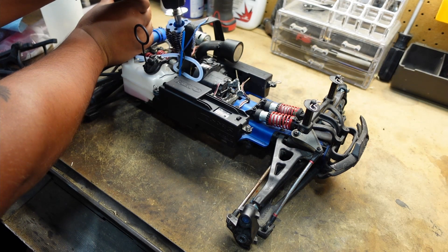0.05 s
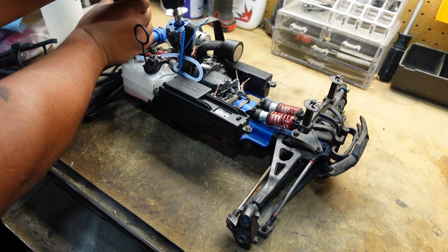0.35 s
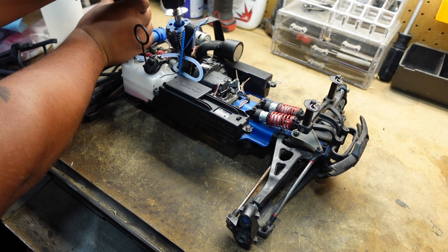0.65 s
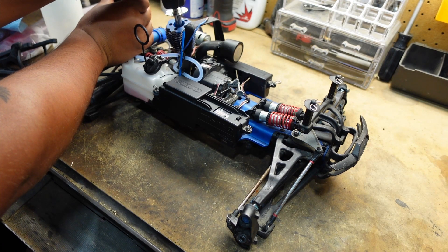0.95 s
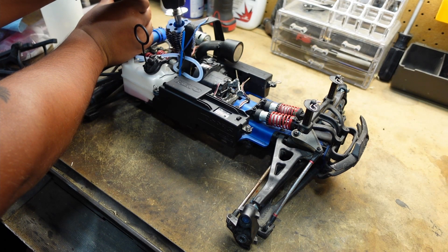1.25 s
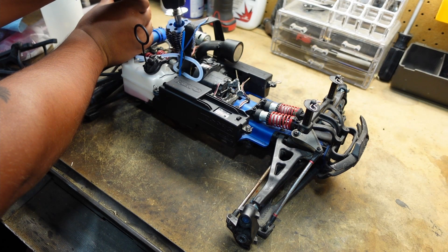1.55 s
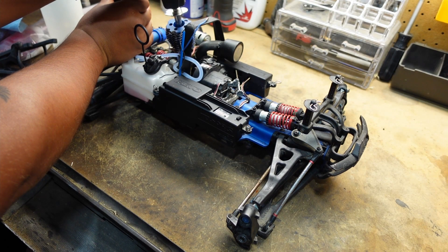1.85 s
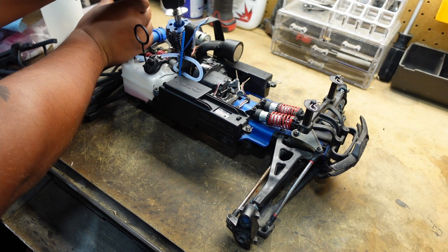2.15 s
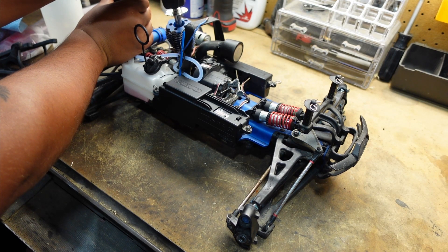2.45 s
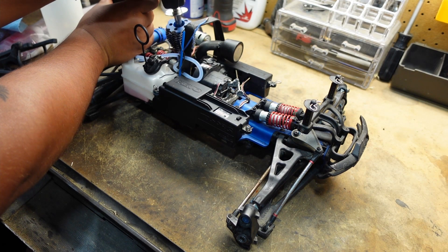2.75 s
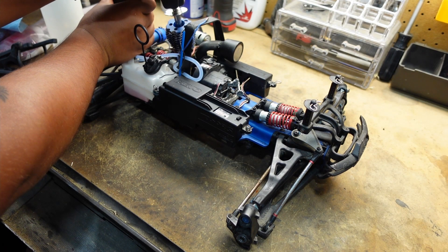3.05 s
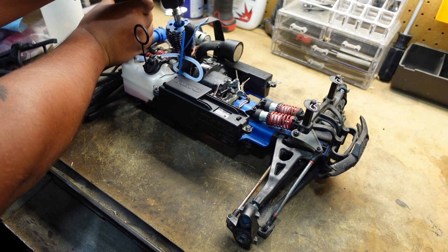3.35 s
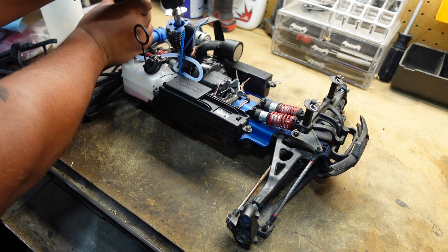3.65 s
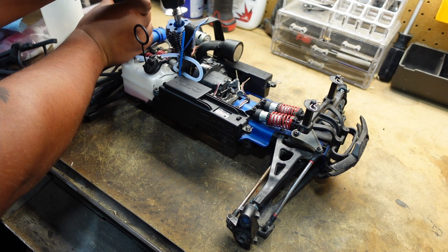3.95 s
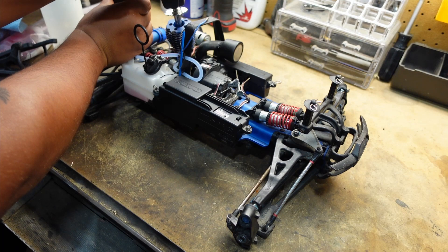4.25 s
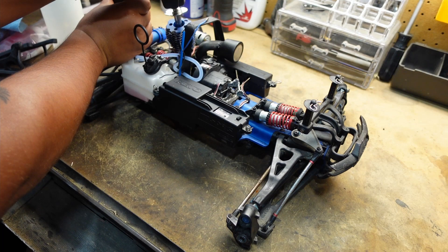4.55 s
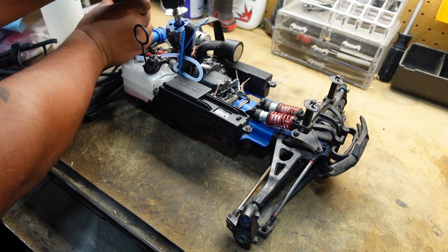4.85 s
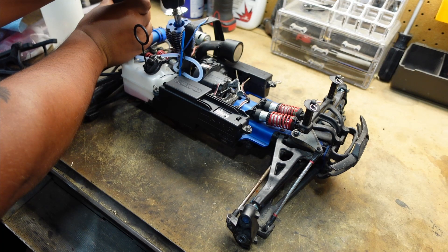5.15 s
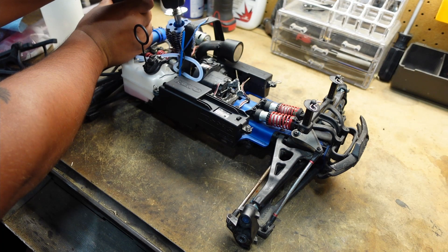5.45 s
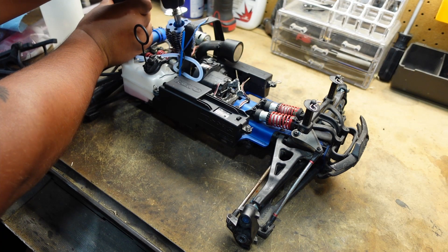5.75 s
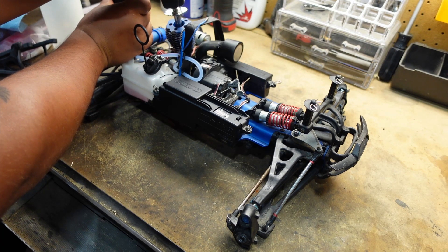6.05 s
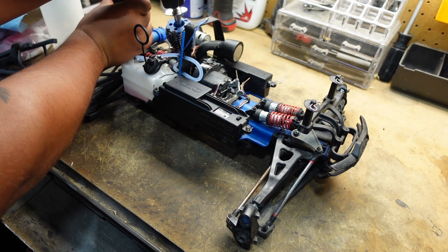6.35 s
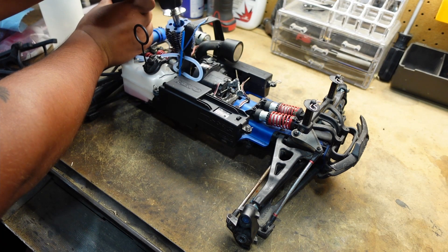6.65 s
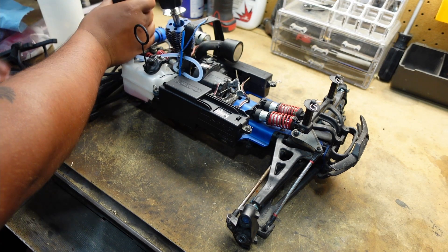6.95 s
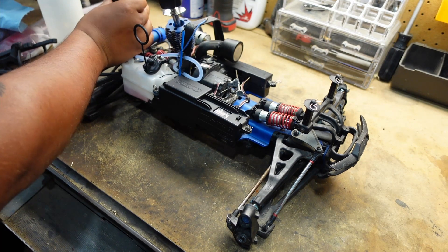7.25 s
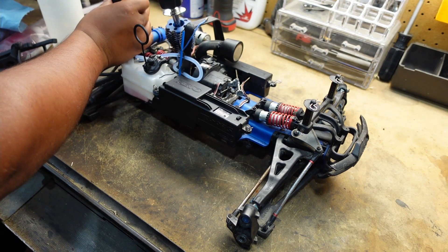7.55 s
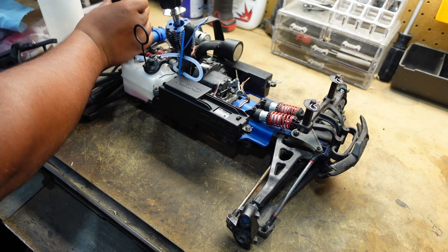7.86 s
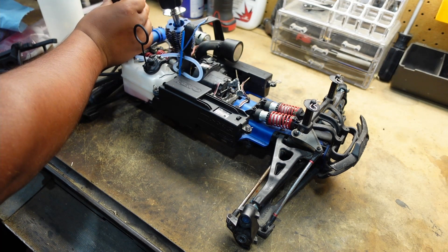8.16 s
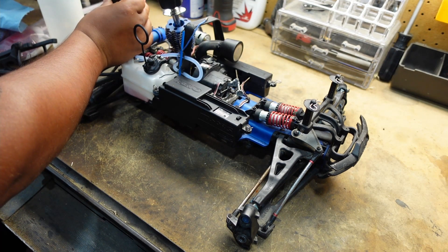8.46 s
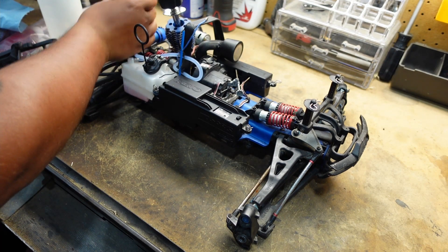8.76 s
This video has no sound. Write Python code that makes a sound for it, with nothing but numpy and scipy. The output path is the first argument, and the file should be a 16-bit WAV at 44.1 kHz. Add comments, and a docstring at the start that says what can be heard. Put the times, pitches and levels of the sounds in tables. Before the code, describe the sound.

An electric starter is already cranking a model truck's small nitro engine, close to the microphone on a garage bench. Sharp, hollow exhaust pops repeat about twenty-four times a second over grinding, whining, clacking gears, with scattered hard metallic snaps. This first burst stops at about 2.6 seconds, followed by small clicks. A second runs from 3.4 to 5.5 seconds, sagging towards its end. Shorter, slower bursts follow at 5.8 to 6.6 and 7.2 to 7.5 seconds, and the most laboured from 7.9 to 8.7. Each restart opens with a quick whirr and a rattling knock, and the motor briefly coasts down after every burst. The engine never fires. Light clicks and faint rubbing fall in the pauses. Near 9 seconds the truck slides and bumps softly on the bench. Short reverberation and a low room hush lie behind everything.

```python
"""A garage bench, one microphone close to a model truck. An electric starter spins its small nitro
engine in five bursts; it never fires. Every turn the gears take up their slack, grind and whine
against the compression, then the port pops into the muffler. The cranking grows slower and more
laboured, and the starter motor coasts down after each burst. Bench and back board give close echoes;
behind them are the walls' short reverberation and a low room tone."""
import sys
import numpy as np
from scipy import signal
from scipy.fft import rfft, irfft, next_fast_len
from scipy.io import wavfile

SR = 44100
rng = np.random.default_rng(int(sys.argv[2]) if len(sys.argv) > 2 else 0)


def transcribe(signal):
    """Save signal, clipped to [-1, 1], as a 16-bit WAV file at the path in sys.argv[1]."""
    frames = np.atleast_2d(signal).T
    limited = np.clip(frames, -1, 1)
    pcm = np.round(limited * 32767).astype(np.int16)
    wavfile.write(sys.argv[1], SR, pcm)


N = 397774

# Pulls of the trigger: (first pop [s], turns [count], first rate [turns/s], last rate [turns/s],
# bend [above 0 the rate sags late, below 0 early])
BURSTS = [ (-.0112, 63, 24.19, 23.46, 6.3), (3.4768, 46, 24.154, 20.78, 2.67),
          (5.8598, 15, 21.27, 16.21, 2.7), (7.252, 5, 21.27, 17.83, 7.7), (8.0633, 10, 16.93, 14.54, -9.4),
          ]
# How hard the gears are pressed together, one entry a burst: (level [dB])
PUSH_DB = [-0.41, -0.019, .2, 1.3, 0.057]
def crank(full_turns_per_s=24, let_go_turns=0.93, slowest=0.64):
    """The starter turns the crank: angle [turns], share of full speed and drive strength, per sample."""
    t, angle, speed, drive = clock(), np.zeros(N), np.ones(N), np.zeros(N)
    for burst, push_db in zip(BURSTS, PUSH_DB):
        turns = turn_times(*burst)
        run_up = 2 * (turns[1] - turns[0])  # from rest it gathers speed evenly over one turn
        now = (t >= turns[0] - run_up) & (t < turns[-1])
        first_turn = np.minimum(1 + (t[now] - turns[0]) / run_up, 1) ** 2
        angle[now] = np.interp(t[now], turns, np.arange(len(turns))) + first_turn - 1
        speed[now] = np.gradient(angle[now]) * SR / full_turns_per_s
        # the trigger is let go during the last turn
        drive[now] = amp(push_db) * np.sqrt(ramp((len(turns) - 1 - angle[now]) / let_go_turns))
    return angle, np.maximum(speed, slowest), drive


def turn_times(first, count, first_rate, last_rate, bend):
    """One burst's whole turns: the starter sags as it tires, and makes a last turn without a pop."""
    tired = np.expm1(bend * np.linspace(0, 1, count)) / np.expm1(bend)
    rate = np.append(first_rate + (last_rate - first_rate) * tired, last_rate)
    return first + np.append(0, np.cumsum(1 / rate))


def crank_passes(share, jitter_s=.00022, wander_s=.0006):
    """Times at which the crank passes this share of a turn; it runs a little unevenly."""
    bursts = [turn_times(*burst) for burst in BURSTS]
    times = np.concatenate([turns[:-1] + share * np.diff(turns) for turns in bursts])
    jitter = jitter_s * rng.standard_normal(len(times))
    return times + jitter + wander_s * np.interp(times, clock(), wobble(6))


# The port from close by, at full speed and barely turning, and the muffler behind it:
# (frequency [Hz], level [dB], t60 [s])
FAST_CRACK_MODES = [(810, -33.5, 0.005), (1290, -15.5, 0.0061), (1478, -24.5, 0.022), (1611, -33.5, 0.054),
                    (1786, -16, 0.007), (2805, -17, 0.0045), (2922, -20, 0.023), (3100, -30, 0.07),
                    (3383, -17.5, 0.0133), (4010, -21.5, 0.0042), (4420, -35.5, 0.079),
                    (4870, -15.5, 0.0045), (5740, -25, 0.011), (7720, -16.5, 0.0048), (7680, -35, 0.0734),
                    (8590, -15, 0.004)]
SLOW_CRACK_MODES = [(637, -35, 0.034), (786, -26.5, 0.021), (1580, -16, 0.0054), (1804, -32, 0.097),
                    (2290, -16.5, 0.0075), (2840, -15.5, 0.0034), (3460, -22, 0.017), (3790, -14, 0.0093),
                    (4510, -26.5, 0.013), (5380, -23.5, 0.0068), (7900, -26.5, 0.012), (9700, -29, 0.0067)]
MUFFLER_MODES = [(137, -26, 0.066), (217.5, -33.5, 0.071), (273.5, -19, 0.014), (427.8, -17.5, 0.04)]
def exhaust(speed, scatter_db=.5, soft_hz=8800, muffler_hz=580, leak_hz=102):
    """The port opens once a turn: a sharp crack, then the muffler's hollow thump."""
    times = crank_passes(0)
    size = amp(scatter_db * rng.standard_normal(len(times)))
    slow = ramp((.96 - np.interp(times - .005, clock(), speed)) / 0.32)
    crack = amp(-2) * through(blows(times, size * np.sqrt(1 - slow)), ring(FAST_CRACK_MODES))
    crack += amp(-1) * through(blows(times, size * np.sqrt(slow)), ring(SLOW_CRACK_MODES))
    # a slow piston uncovers the port more gradually, so the gas leaves later and booms deeper
    later = times + 0.000076 + 0.0016 * slow
    gas = through(blows(later, amp(-.5 * slow) * np.sqrt(size)), ring(MUFFLER_MODES))
    gas += through(blows(later, amp(-27) * np.sqrt(slow)), ring([(181, 0.016, 0.056)]))
    muffled = passed(gas, muffler_hz, "low", order=4)
    return passed(crack, soft_hz, "low", order=4), passed(muffled, leak_hz, "high", order=7)


# Grinding teeth, close up: (frequency [Hz], spectral level [dB])
GRIND_SPECTRUM = [(42, -8.5), (75, -16), (180, 0.5), (300, -10), (560, -15.5), (800, -3), (1000, -6),
                  (1400, -2), (2400, 0.5), (3600, 2), (5800, -3), (9700, -5), (11000, -12), (15000, -8.5),
                  (16000, -24)]
# How strongly the gear case radiates a tone: (frequency [Hz], gain [dB])
GEAR_CASE_RESPONSE = [(1100, -7), (1500, -4), (1950, 1), (2700, -9), (3750, 2), (4400, -3), (5100, 1),
                      (6000, 0), (8000, -7)]
def gears(angle, speed, drive, teeth=83, grind_db=-26.5, slack_db=-5, whine_db=-32.7, bite_turns=0.37):
    """The gears run slack after each pop, then bite and grind up to the next compression."""
    turn = angle % 1
    since_bite = turn - bite_turns
    load = ramp(since_bite / 0.017 + .5) * amp(-4 * since_bite) * (1 - ramp((turn - .72) / 0.4))
    contact = (load + amp(slack_db)) / (1 + amp(slack_db))
    # compression brakes the crank within each turn, the more so the slower it runs
    swing = np.clip(.1 / speed ** 2.3, 0, .3) * np.sin(2 * np.pi * (turn - .5))
    mesh_phase = teeth * (2 * np.pi * angle + swing) + .22 * wobble(700)
    scrape = chassis_noise(GRIND_SPECTRUM) * unit(amp(2 * np.cos(mesh_phase)))
    grind = amp(grind_db + 16 * np.log10(speed) + 0.66 * wobble(25)) * contact * scrape
    # the meshing teeth sing a falling chirp that flares as it crosses the resonances of the case
    chirp = sum(amp(db + 2.5 * wobble(220)) * np.sin(k * mesh_phase)
                for k, db in enumerate([0, -11, 0, -11], 1))
    whine = filtered(chirp, lambda hz: amp(along(GEAR_CASE_RESPONSE, hz)))
    strain = ramp((turn - .5) / .22) * (1 - ramp((turn - .78) / .2))
    return drive * (grind + amp(whine_db) / speed ** .5 * strain * whine)


# Metal striking metal in the drive: (frequency [Hz], spectral level [dB])
CLACK_SPECTRUM = [(150, -13.5), (550, -15.5), (800, -1), (1100, -2.5), (1800, -1.5), (3200, 3.5),
                  (5000, -3), (9000, -16), (15000, -23)]
def clacks(speed, clack_db=-24, bite_turns=.425, bounces=3, spread_s=0.0049, scatter_db=1.0):
    """The drive takes up its backlash once a turn, in a few quick uneven bounces."""
    times = crank_passes(bite_turns)[:, None]
    scatter = scatter_db * rng.standard_normal((len(times), bounces))
    delays = spread_s * (np.arange(bounces) + rng.random((len(times), bounces))) / bounces
    db = clack_db + 50 * np.log10(np.interp(times, clock(), speed)) + scatter
    power = through(blows((times + delays).ravel(), amp(db).ravel() ** 2), fading(0.02) ** 2)
    return np.sqrt(np.abs(power)) * chassis_noise(CLACK_SPECTRUM)


# Hard snaps of the drive: (time [s], level [dB])
SNAPS = [(0.173, -6.5), (0.2967, -15), (0.3371, -13.5), (0.5008, -17), (0.5422, -12), (0.7927, -11),
         (1.1657, -12.5), (1.8664, -8.5), (1.9515, -6.5), (2.4957, -9), (4.5416, -11), (5.1616, -5.5),
         (7.2732, -8)]
def snaps(gain_db=-13, rebound_s=.0025, rebound_db=-2, t60_s=0.022, thin_hz=1150):
    """Now and then the drive snaps home hard and rebounds once."""
    times, db = np.transpose(SNAPS)
    hits = blows(times, amp(db) ** 2) + blows(times + rebound_s, amp(db + rebound_db) ** 2)
    envelope = np.sqrt(np.abs(through(hits, fading(t60_s) ** 2)))
    thin_metal = unit(passed(chassis_noise(CLACK_SPECTRUM), thin_hz, "high", order=4))
    return amp(gain_db) * envelope * thin_metal


def grip(loose_db=-7, skip_s=0.0047):
    """Gain of the drive: 1 while it holds, less as it misses its grip just before a snap."""
    times = np.transpose(SNAPS)[0]
    steps = np.ones(len(times))
    loose = np.cumsum(blows(times - skip_s, steps) - blows(times, steps))
    return amp(loose_db * loose)


# The drive catches the resting engine, from the second burst on:
# (time [s], whirr level before it [dB], knock level [dB], rattle t60 [s], puff delay [s])
CATCHES = [(3.392, -35.5, -7, .1, 0.0112), (5.764, -37, -7.5, 0.081, .012), (7.163, -35.5, -8, 0.095, .012),
           (7.94, -43.5, -18.5, 0.18, .024)]
TRIGGER_LEAD_S = 0.07  # the trigger clicks this long before each catch
def catches(knock_gain_db=-1, rattle_gain_db=-21):
    """The drive catches with a rattling knock and the half-filled cylinder gives a soft puff."""
    times, _, db, t60, delay = np.transpose(CATCHES)
    knock = through(blows(times, amp(db + knock_gain_db)), ring(SLOW_CRACK_MODES))
    shake = sum(through(blows(times[[k]], amp(db[[k]] / 2)), fading(t60[k])) for k in range(len(times)))
    cylinder = ring([(185, -29, .15), (125, -35, .1), (380, -36, .07)])
    puff = through(blows(times + delay, np.ones(len(times))), cylinder)
    return knock + amp(rattle_gain_db) * shake * chassis_noise(CLACK_SPECTRUM) + puff


# The starter running free, close up: (frequency [Hz], spectral level [dB])
MOTOR_SPECTRUM = [(88, -33), (150, -7.5), (254, -10), (439, -24), (601, -18), (821, -1), (1060, -1.5),
                  (4320, 0.5), (9260, -10), (16000, -21.5)]
# Its housing: (frequency [Hz], level [dB], t60 [s])
HOUSING_MODES = [(990, -10.5, 0.089), (2870, -1.5, 0.066), (3690, -1, 0.09)]
def motor(gain_db=-2.5, rise_s=.045, handover_s=.018, coast_db=-49, hold_s=0.082, fall_db_per_s=145):
    """The starter motor whirrs up, gives way to the gears, and coasts down after the release."""
    t = clock()
    rising = sum(amp(db) * ramp((t - s + TRIGGER_LEAD_S) / rise_s) * ramp(1 - (t - s) / handover_s)
                 for s, db, *_ in CATCHES)
    since_release = [t - turn_times(*burst)[-1] for burst in BURSTS]
    coasting = sum(ramp(1 + age / handover_s) * amp(coast_db - fall_db_per_s * (age - hold_s).clip(0))
                   for age in since_release)
    # the housing sings only while the motor pulls hard
    pull = amp(-1) * rising ** 2 / rising.max()
    housing = pull * unit(through(rng.standard_normal(N), ring(HOUSING_MODES)))
    flutter = amp(gain_db + wobble(40) + 1.2 * wobble(700))
    return flutter * ((rising + coasting) * chassis_noise(MOTOR_SPECTRUM) + housing)


# Resonances of chassis and gear case: (frequency [Hz], width [Hz], lift [dB])
CHASSIS_RESONANCES = [(812, 39, 5.5), (1250, 210, 2), (1820, 190, 0), (2760, 40, 0.5), (3065, 60, 0.5),
                      (3540, 150, -2), (3770, 58, 5.5), (4760, 74, 2.5), (5800, 89, 3.5), (7500, 100, 1),
                      (8600, 15, 6.5)]
def chassis_noise(spectrum):
    """Noise of rms 1 as the chassis radiates it towards the microphone."""
    def lift(hz):
        return sum(db / (1 + (2 * (hz - centre) / width) ** 2) for centre, width, db in CHASSIS_RESONANCES)
    return unit(filtered(rng.standard_normal(N), lambda hz: amp(along(spectrum, hz) + lift(hz))))


# Small clicks of the starter: (time [s], level [dB])
CLICKS = [(2.8177, -38.5), (2.8928, -47), (2.9991, -66), (5.669, -36), (6.813, -34.5), (6.885, -57),
          (7.767, -52.5), (8.9206, -37.5), (8.9725, -39)]
# Their colour: (frequency [Hz], spectral level [dB])
CLICK_SPECTRUM = [(500, -22), (3000, -15), (5000, -8), (9000, -13.5), (15000, -27.5)]
def clicks(gain_db=-9, trigger_db=-53, t60_s=0.035):
    """The starter and its trigger give short, bright clicks."""
    times, db = np.transpose(CLICKS + [(s - TRIGGER_LEAD_S, trigger_db) for s, *_ in CATCHES])
    return through(blows(times, amp(db + gain_db)), fading(t60_s)) * noise(CLICK_SPECTRUM)


# The bench top under the truck: (frequency [Hz], spectral level [dB])
BENCH_SPECTRUM = [(35, -29.5), (60, -6), (589, -3.5), (1170, -13.5), (1910, -10.5), (5400, -24),
                  (12000, -62), (15600, -93), (22000, -120)]
def bench_bump(slide_at_s=8.932, slide_db=-53, thud_at_s=8.989, thud_db=-38.5, rise_s=0.0093, t60_s=.05):
    """At the end the truck slides on the bench and bumps down."""
    slide = amp(slide_db) * ramp((clock() - slide_at_s) / rise_s)
    age = clock() - thud_at_s
    thud = ramp(age / rise_s) * amp(thud_db - 60 * np.maximum(age - rise_s, 0) / t60_s)
    return (slide + thud) * noise(BENCH_SPECTRUM)


# The starter shifts in the hand, and at the end the truck scrapes as it slides on the bench: # (time [s],
# length [s], level [dB])
RUBS = [(2.757, .05, -53), (7.588, 0.048, -48.5), (7.736, 0.16, -64.5), (8.942, .06, -55)]
def rubs(rough_db=3):
    """Faint scratchy rubbing as the starter is reseated after a burst, and a higher scrape as the truck slides
    on the bench at the end."""
    t = clock()
    level = sum(amp(db) * ramp(2 * (t - s) / length) * ramp(2 * (s + length - t) / length)
                for s, length, db in RUBS)
    return level * amp(rough_db * wobble(170)) * chassis_noise(MOTOR_SPECTRUM)


# Bench and back board, by paths about 1 and 2 m longer than the direct one: (delay [s], level [dB])
CLOSE_ECHOES = [(.0031, -5.5), (.0059, -11.5)]
def with_echoes(x):
    """The direct sound reaches the microphone first, then its echoes off the surfaces close by."""
    return x + sum(amp(db) * np.pad(x, (round(s * SR), 0))[:N] for s, db in CLOSE_ECHOES)


# The garage walls, farther off: (frequency [Hz], t60 [s])
WALL_DECAY = [(150, 0.54), (1000, 0.26), (4000, 0.18), (14000, 0.32)]
def reverberation(x, delay_s=.006):
    """The garage's diffuse answer; each frequency dies at its own speed."""
    hz, t, spectra = signal.stft(rng.standard_normal(SR // 2), SR, nperseg=256)
    tail = signal.istft(spectra * amp(-60 * t / along(WALL_DECAY, hz)[:, None]), SR, nperseg=256)[1]
    return through(x, np.pad(tail / np.linalg.norm(tail), (round(delay_s * SR), 0)))


# The quiet garage all around the microphone: (frequency [Hz], spectral level [dB])
ROOM_TONE_SPECTRUM = [(25, -6), (90, -7), (190, -6.5), (300, -12), (370, -7.5), (520, -19), (850, -19.5),
                      (1900, -28), (3000, -38), (16000, -49)]
def room_tone(level_db=-61):
    """A steady low hush behind everything."""
    return amp(level_db) * noise(ROOM_TONE_SPECTRUM)


def amp(db):
    """Decibels to gain."""
    return 10 ** (np.asarray(db) / 20)


def unit(x):
    """Scale to rms 1."""
    return x / np.sqrt(np.mean(x ** 2) + 1e-20)


def along(points, hz):
    """Interpolate (Hz, value) points on a log axis."""
    f, v = np.transpose(points)
    return np.interp(np.log(hz + 1), np.log(f + 1), v)


def clock():
    """The time of every sample."""
    return np.arange(N) / SR


def ramp(x):
    """A smooth step as x goes from 0 to 1."""
    return np.sin(np.pi / 2 * np.clip(x, 0, 1)) ** 2


def wobble(rate):
    """A smooth random curve, rate knots a second."""
    knots = rng.standard_normal(int(N * rate / SR) + 4)
    fine = signal.resample_poly(knots, 8, 1)
    return np.interp(clock() * rate, np.arange(len(fine)) / 8, fine)


def filtered(x, response):
    """x times a response of frequency."""
    size = next_fast_len(N + SR // 2)
    return irfft(rfft(x, size) * response(np.fft.rfftfreq(size, 1 / SR)), size)[:N]


def passed(x, hz, kind, order):
    """A causal low- or high-pass."""
    return signal.sosfilt(signal.butter(order, hz, kind, fs=SR, output="sos"), x)


def noise(spectrum):
    """Coloured noise of rms 1."""
    return unit(filtered(rng.standard_normal(N), lambda hz: amp(along(spectrum, hz))))


def blows(times, sizes):
    """One impulse at each time within the scene."""
    inside = (times >= 0) & (times < (N - 1) / SR)
    return np.bincount(np.round(times[inside] * SR).astype(int), sizes[inside], N)


def through(x, response):
    """x played through an impulse response."""
    return signal.fftconvolve(x, response)[:N]


def fading(t60):
    """An envelope that falls 60 dB in t60 seconds."""
    return amp(-60 * np.arange(SR // 8) / SR / t60)


def ring(modes):
    """Impulse response of (Hz, dB, t60) modes; neighbours swing in opposite senses."""
    t = np.arange(SR // 8) / SR
    return -sum((-1) ** k * amp(db) * fading(t60) * np.sin(2 * np.pi * hz * t)
                for k, (hz, db, t60) in enumerate(modes))


def scene():
    """Engine and starter close up on the bench, the quiet garage behind them, in mono."""
    angle, speed, drive = crank()
    crack, thump = exhaust(speed)
    starter = grip() * (gears(angle, speed, drive) + clacks(speed)) + snaps() + motor()
    bright = with_echoes(crack) + catches() + starter + clicks() + bench_bump() + rubs()
    walls = reverberation(amp(-11.5) * bright + amp(-17) * thump)
    return (bright + thump + walls + room_tone())[None]


def record(dry):
    """The camera at the bench keeps nothing above its band limit."""
    top_hz = 15950
    return filtered(dry[0], lambda hz: hz < top_hz)[None]


dry = scene()
out = record(dry)
transcribe(out)
```